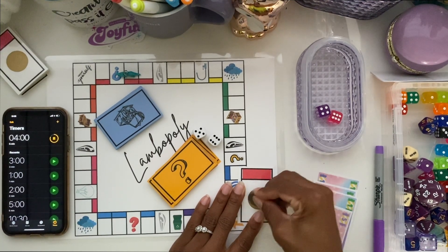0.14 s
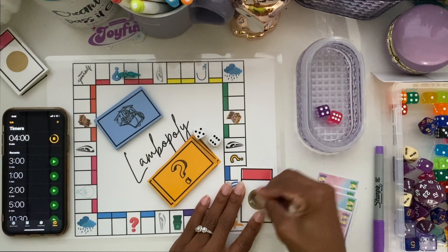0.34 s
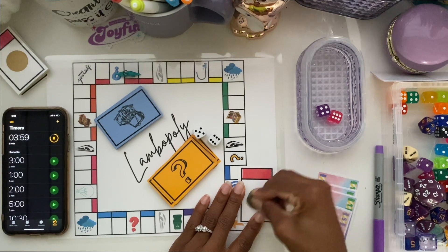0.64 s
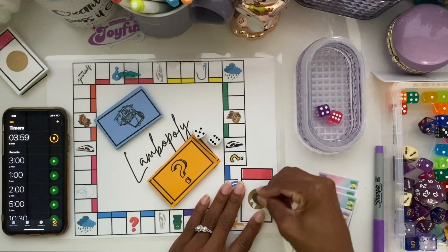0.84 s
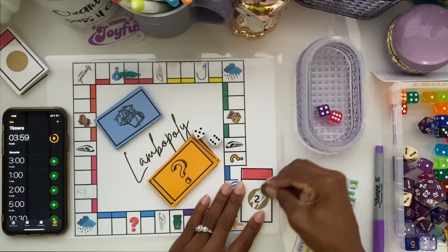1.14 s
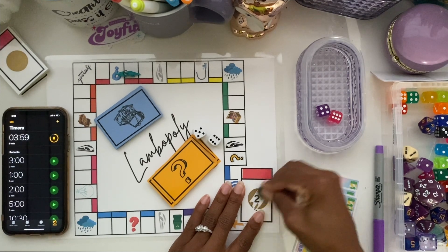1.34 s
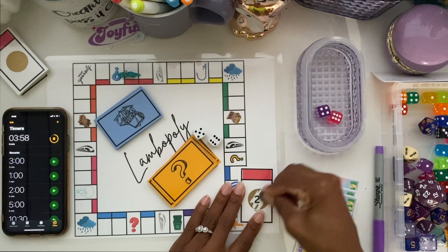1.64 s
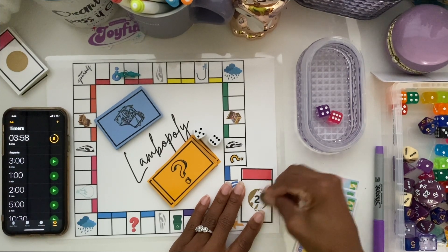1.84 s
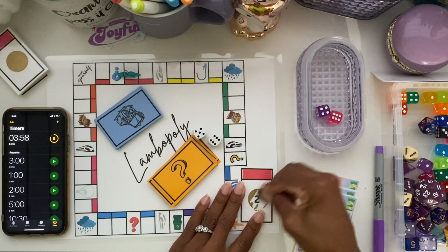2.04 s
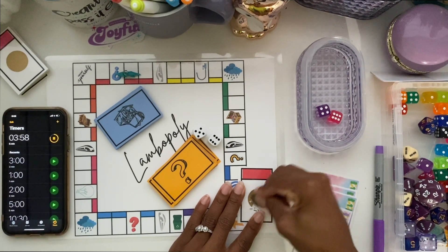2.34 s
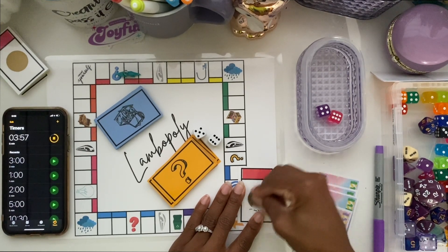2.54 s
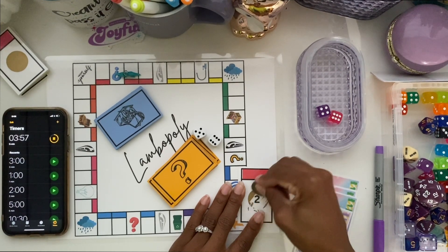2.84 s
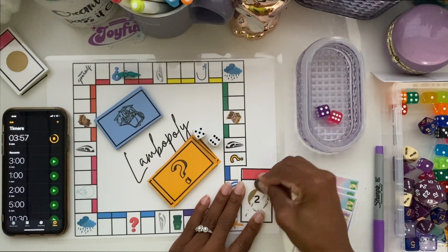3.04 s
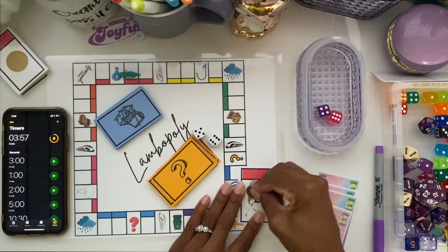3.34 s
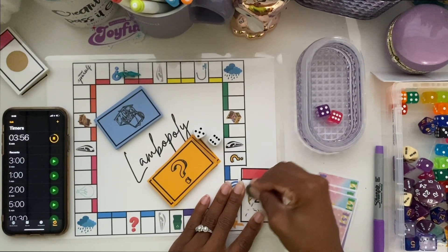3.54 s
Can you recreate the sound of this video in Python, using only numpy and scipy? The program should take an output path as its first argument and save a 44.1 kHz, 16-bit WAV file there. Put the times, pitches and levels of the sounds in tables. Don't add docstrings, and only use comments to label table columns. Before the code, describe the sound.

A coin scratches coating off a card on a table, about nine or ten short gritty strokes a second, from 0 to about 3.6 seconds. Strokes vary in loudness; the edge snags and knocks the board, notably near 0.65, 2.35 and 2.55 seconds, with a lesser knock near 3.5. The highest hiss dulls towards the end. Close stereo pickup, quiet room, faint low hum.

```python
import sys
import numpy as np
from scipy import signal
from scipy.fft import rfft, irfft, next_fast_len
from scipy.io import wavfile
from scipy.ndimage import uniform_filter1d

SR = 44100
rng = np.random.default_rng(int(sys.argv[2]) if len(sys.argv) > 2 else 0)


def amplitude_ratio(level_db):
    exponent = np.asarray(level_db, float) / 20
    return 10 ** exponent


def unload_audio(sound):
    columns = np.transpose(np.atleast_2d(sound))
    steps = np.round(np.clip(columns, -1, 1) * 32767)
    wavfile.write(sys.argv[1], SR, steps.astype(np.int16))


N = 163170

# pitch_hz, level_db (per Hz)
ROOM_AIR = [(30, -20), (55, 4.5), (130, -1.5), (500, -13), (1500, -32), (5000, -42), (11000, -40),
            (15000, -61)]
# pitch_hz, likeness_0_to_1
ROOM_LIKENESS = [(200, .98), (1500, .6), (6000, .99)]
ROOM_DB = -58
HUM_HZ, HUM_WIDTH_HZ, HUM_DB = 58.8, 0.92, -58.5

# start_s, length_s, hiss_db, card_db, table_db
EARLY_STROKES = [(0.045, 0.069, -71.5, -74.5, -67.5), (0.131, 0.082, -69.5, -68, -55.5),
                 (0.261, 0.075, -72.5, -74.5, -64), (0.361, 0.077, -66, -64.5, -53.5),
                 (0.471, 0.066, -73.5, -73.5, -62.5), (0.598, 0.069, -67.5, -67, -54.5),
                 (0.696, 0.097, -71.5, -72, -66.5), (0.811, 0.071, -70.5, -70.5, -61.5),
                 (0.946, 0.053, -66, -67.5, -65.5), (1.037, 0.075, -66.5, -65.5, -57.5),
                 (1.146, 0.076, -66, -68.5, -71), (1.257, 0.059, -68.5, -71, -62),
                 (1.361, 0.096, -71, -68, -67.5), (1.475, 0.08, -69, -67.5, -57.5),
                 (1.584, 0.076, -70, -73.5, -68), (1.689, 0.077, -70, -66.5, -58.5),
                 (1.793, 0.063, -67.5, -67.5, -69)]
LATE_STROKES = [(1.9, 0.057, -69, -66.5, -64), (1.985, 0.077, -73, -73.5, -67),
                (2.088, 0.078, -69.5, -69, -59.5), (2.183, 0.077, -70, -72, -70),
                (2.306, 0.057, -68.5, -65.5, -52), (2.385, 0.087, -73.5, -73.5, -66.5),
                (2.494, 0.081, -70, -69, -57), (2.593, 0.087, -73.5, -68.5, -63),
                (2.706, 0.083, -72, -69.5, -54.5), (2.809, 0.059, -74, -71, -71.5),
                (2.916, 0.069, -73, -72.5, -54.5), (3.019, 0.07, -68, -67, -60),
                (3.117, 0.071, -71.5, -73.5, -59), (3.222, 0.06, -68.5, -69.5, -69),
                (3.334, 0.043, -72.5, -72.5, -57.5), (3.418, 0.056, -72.5, -69.5, -72),
                (3.504, 0.062, -69.5, -71, -51), (3.603, 0.061, -74, -74.5, -83)]
# hiss_db, card_db, table_db
STROKE_LEAN = [
    [5, 0.7, .1],
    [4.3, 0.76, -0.058],
]
RISE, FALL = 0.5, 0.28
# hiss_db, card_db, table_db
OWN_JUDDER_DB = [.8, 2.5, 2.5]
SHARED_JUDDER_DB = 1.5
GRIT_PER_S, GRIT_DB = 14000, 1.5
LUMPS_PER_S, LUMP_DB = 700, 4
# time_s, level_db
COIN_TILT = [(.1, -2), (.3, -1), (.5, -2), (.73, -2), (.95, -5.5), (1.18, -3.5), (1.4, 0), (1.62, -1.5),
             (1.83, -4.5), (2.03, 1), (2.22, -1), (2.42, 0), (2.63, 1.5), (2.84, 3), (3.05, .5), (3.25, 2),
             (3.45, 1.5), (3.64, 1.5)]
# time_s, level_db
COATING_WEAR = [
    (2.3, -10.5),
    (3.45, -18),
    (3.7, -29),
]
# low_db, middle_db
HISS_DB = [-3.5, -2]
GRIT_EDGE_HZ = 15600

# time_s, board_db, table_db, card_db, tick_db
SNAGS = [(0.134, -39, -46.5, -65, -82), (0.199, -55, -49.5, -58.5, -80),
         (0.248, -55, -56.5, -69, -88), (0.361, -48, -66, -76, -85), (0.378, -41.5, -69, -66, -72),
         (0.417, -61, -44.5, -79, -63), (0.438, -42.5, -42.5, -60, -85),
         (0.594, -48.5, -59, -66, -86), (0.645, -27, -37.5, -41.5, -61),
         (0.652, -22.5, -43, -40, -68), (0.712, -36, -38, -53, -67), (0.774, -45, -72, -50.5, -65),
         (0.816, -43, -61.5, -62, -77), (0.924, -55, -70, -74, -94), (0.986, -44, -54, -60, -82),
         (1.036, -49, -73, -69, -80), (1.086, -42.5, -43, -67, -59.5), (1.106, -35, -44, -45.5, -58),
         (1.313, -33.5, -36.5, -44, -57.5), (1.362, -43, -69, -66, -86),
         (1.435, -33.5, -43.5, -45.5, -72), (1.479, -38, -43, -68, -83), (1.703, -59, -59, -64, -71),
         (1.738, -39, -68, -64, -78),
         (1.928, -47, -51, -57, -75), (1.942, -40.5, -46.5, -67, -82), (1.961, -48, -60, -57.5, -74),
              (1.99, -53, -62, -58, -73), (2.04, -43, -52, -49.5, -72), (2.049, -50, -52, -53.5, -77),
              (2.146, -31, -38, -41, -54), (2.185, -40.5, -43, -52, -69), (2.344, -18, -32.5, -27.5, -53),
              (2.39, -38.5, -41, -51.5, -75), (2.455, -36, -47.5, -41.5, -50.5),
              (2.556, -15.5, -38, -29, -50), (2.595, -38, -41, -51.5, -72), (2.637, -42, -62, -61, -67),
              (2.713, -62, -72, -70, -84), (2.766, -45.5, -37.5, -54, -64), (2.825, -65, -46, -51, -69),
              (2.835, -36.5, -50, -55.5, -61), (2.947, -44.5, -45, -60, -70),
              (2.964, -45, -38.5, -48.5, -79), (3.028, -56, -51, -52, -77), (3.037, -40.5, -55, -48.5, -73),
              (3.069, -45, -79, -54, -68), (3.282, -44, -49, -58.5, -77), (3.323, -47.5, -55, -69, -91),
              (3.47, -38.5, -50, -54.5, -72), (3.508, -28.5, -42.5, -61, -82), (3.554, -52, -55, -67, -82)]
# board_db, table_db, card_db, coin_db
SNAG_TRIM_DB = [-8, 8.5, 2, 7.5]
# board_s, table_s, card_s, coin_s
CONTACT_S = [.00008, .0004, .00003, .000004]
CHATTER = [.03, .01, .2, .5]
RATTLE = [0.04, 0.047, 0.098, 0.014]
# low_db, middle_db, top_db
TICK_DB = [-4.5, -6.5, -7.5]
# low_hz, high_hz
CLICK_BAND = [7600, 15300]
SNAG_S, RATTLE_S = 0.0008, 0.0064
CLICK_DB, BOARD_DB = -5, -1

# pitch_hz, level_db, t60_s
TABLE_MODES = [(82.8, -4, 0.46), (134, -4.5, 0.042), (181, -1, 0.14), (240, -3.5, 0.11),
               (320.9, -2.5, 0.33), (430.5, 3.5, 0.3)]
BOARD_MODES = [(562, 1, 0.016), (626, 0.5, 0.098), (698, 2, 0.031), (909, -1.5, 0.043), (1084, -1.5, 0.033),
               (1214, -2.5, 0.084)]
CARD_MODES = [(1530, 2, 0.019), (1738, -2.5, 0.014), (2274, -1, 0.042), (2730, -9.5, 0.019),
              (3040, 0, 0.0087), (3456, -8, 0.013), (3910, -22.5, 0.0099)]
COIN_MODES = [(4503, 5, 0.0034), (5660, -14, 0.0076), (6970, 2.5, 0.0041), (7740, -3, 0.0041),
              (9490, -2, 0.0024), (11820, -10.5, 0.0016), (12480, -32, 0.0024), (14900, -27, 0.0055)]
BEND_S = 0.0018
SPOT_DB, SPOT_DETUNE, SPOTS_PER_S = 2.5, 0.012, 3.1
CRACK_DB, CRACK_CYCLES, CRACK_HZ = 8, 2.6, 200

# pitch_hz, lag_radians
PORT_LAG = [(0, 0), (3000, -.7), (5200, -.4), (7000, -3), (7750, -3.4), (10500, -6.3), (12900, -9.1),
            (14000, -9.65), (17000, -12.6)]
# pitch_hz, level_db
PORT_BALANCE = [(60, -0.5), (350, -4.5), (1400, 3), (2800, 0)]
# pitch_hz, level_db
PORT_SPREAD = [(300, -26), (1000, -11), (5500, -12), (7000, -28)]
ECHO_T60, ECHO_DB, ECHO_DULL_HZ = 0.13, -8.5, 2420
SWEEP_SAMPLES = 0.12
EDGE_HZ = 16550


def evened(x):
    return x / np.sqrt(np.mean(x ** 2) + 1e-20)


def read(points, hz):
    f, value = np.transpose(points)
    return np.interp(np.log(hz + 1), np.log(f + 1), value)


def right_lag(hz):
    return np.exp(1j * np.interp(hz, *np.transpose(PORT_LAG)))


def room():
    hz = np.fft.rfftfreq(N, 1 / SR)
    a, b, c, d, e, f = rng.standard_normal((6, len(hz)))
    same = np.clip(read(ROOM_LIKENESS, hz), 0, 1)
    left = a + 1j * b
    right = right_lag(hz) * (same * left + np.sqrt(1 - same ** 2) * (c + 1j * d))
    colour = amplitude_ratio(read(ROOM_AIR, hz)) * (hz < GRIT_EDGE_HZ)
    air = irfft(colour * np.array([left, right]), N)
    waver = irfft((e + 1j * f) / (1 + (2 * (hz - HUM_HZ) / HUM_WIDTH_HZ) ** 2), N)
    hum = 0.5 * evened(waver) + np.sin(2 * np.pi * HUM_HZ * np.arange(N) / SR)
    return amplitude_ratio(ROOM_DB) * evened(air) + amplitude_ratio(HUM_DB) * evened(hum)


def pressure():
    t, out = np.arange(N) / SR, np.zeros((3, N))
    for k, (start, length, *levels_db) in enumerate(EARLY_STROKES + LATE_STROKES):
        u = (t - start) / length
        ramp = np.clip(np.minimum((u + 0.25) / RISE, (1.1 - u) / FALL), 0, 1)
        shape = np.sin(np.pi / 2 * ramp) ** 2.67
        lean = amplitude_ratio(np.c_[STROKE_LEAN[k % 2]] * np.clip(u - 0.5, -1, 1))
        out += amplitude_ratio(levels_db)[:, None] * shape * lean
    judder = uniform_filter1d(rng.standard_normal((4, N)), size=350)
    judder = evened(uniform_filter1d(judder, size=350))
    return out * amplitude_ratio(SHARED_JUDDER_DB * judder[3] + np.c_[OWN_JUDDER_DB] * judder[:3])


def grains(per_s, spread_db):
    chance, size, sign = rng.random(N), rng.exponential(1, N), rng.choice([-1., 1.], N)
    return evened((chance < per_s / SR) * sign * amplitude_ratio(spread_db * np.minimum(size, 4)))


def snags():
    rows, t = SNAGS, np.arange(1200) / SR
    force, rough = np.zeros((4, N)), rng.standard_normal((len(rows), 1200))
    knock = np.arange(1200) == round(SNAG_S * SR)
    for (time, *levels_db), r in zip(rows, rough):
        blow = np.c_[CHATTER] * r * t / SNAG_S * np.exp(1 - t / SNAG_S) + knock
        blow = blow + np.c_[RATTLE] * r * (abs(r) > 2.3) * np.exp(-t / RATTLE_S)
        blow = blow / np.linalg.norm(blow, axis=1)[:, None]
        at = round(time * SR)
        force[:, at:at + 1200] += amplitude_ratio(np.add(levels_db, SNAG_TRIM_DB))[:, None] * 9 * blow
    soft = np.exp(-((t - t[-1] / 2) / np.c_[CONTACT_S]) ** 2 / 2)
    return signal.oaconvolve(force, soft / soft.sum(1)[:, None], "same", axes=1)


def ring(modes):
    t, out = np.arange(6000) / SR, 0
    spot = rng.standard_normal((len(modes), 2))
    for k, ((hz, db, t60), (louder, sharper)) in enumerate(zip(modes, spot)):
        decay = amplitude_ratio(db + SPOT_DB * louder - 60 * t / t60) / np.sqrt(t60)
        swell = 1 - np.exp(-(t / (BEND_S * np.sqrt(500 / hz))) ** 2)
        crack = 1 + (hz > CRACK_HZ) * amplitude_ratio(CRACK_DB) * np.exp(-t * hz / CRACK_CYCLES)
        tone = np.sin(2 * np.pi * hz * (1 + SPOT_DETUNE * sharper) * t + np.pi * k)
        out = out + decay * swell * crack * tone
    return out / np.linalg.norm(out)


def coin():
    t = np.arange(N) / SR
    hiss, card, table = pressure()
    grit, lumps = grains(GRIT_PER_S, GRIT_DB), grains(LUMPS_PER_S, LUMP_DB)
    grit = signal.oaconvolve(grit, signal.firwin(255, GRIT_EDGE_HZ, fs=SR), "same")
    board_rub = amplitude_ratio(BOARD_DB) * card ** 0.31 * table ** 0.74 * lumps
    table_rub = table * lumps
    card_rub = card * (1.13 * grit + 0.19 * lumps)
    coin_rub = hiss * amplitude_ratio(1.5) * grit

    blows = snags()
    click = signal.oaconvolve(blows[3], signal.firwin(63, CLICK_BAND, pass_zero=False, fs=SR), "same")
    tilt_db = np.interp(t, *np.transpose(COIN_TILT))
    worn_db = np.interp(t, *np.transpose(COATING_WEAR))
    hiss_db = [HISS_DB[0], HISS_DB[1] + tilt_db, tilt_db + worn_db]
    forces = [board_rub + blows[0], table_rub + blows[1], card_rub + blows[2]]
    forces += [blows[3] * amplitude_ratio(tick) + coin_rub * amplitude_ratio(db) for tick, db in zip(TICK_DB, hiss_db)]
    bodies = [BOARD_MODES, TABLE_MODES, CARD_MODES, COIN_MODES[:3], COIN_MODES[3:6], COIN_MODES[6:]]

    spots = [np.sqrt(2 / 3) * abs(np.cos(np.pi * (SPOTS_PER_S * t + k / 3))) for k in range(3)]
    out = amplitude_ratio(CLICK_DB) * click
    for force, modes in zip(forces, bodies):
        for weight in spots:
            out = out + signal.oaconvolve(force * weight, ring(modes))[:N]
    return out


def ports(x):
    size, t = next_fast_len(N + SR // 2), np.arange(SR // 4) / SR
    hz = np.fft.rfftfreq(size, 1 / SR)
    near = rng.standard_normal(SR // 4) * amplitude_ratio(-60 * t / 0.02)
    unlike = amplitude_ratio(read(PORT_SPREAD, hz)) * rfft(near / np.linalg.norm(near), size)
    far = rng.standard_normal((2, SR // 4)) * amplitude_ratio(-60 * t / ECHO_T60) * (t > 0.004)
    echo = amplitude_ratio(ECHO_DB) * rfft(far / np.linalg.norm(far[0]), size)
    echo = echo / np.sqrt(1 + (hz / ECHO_DULL_HZ) ** 2)
    apart = np.clip(np.minimum(hz / 1500, 2 - hz / 3500), 0.08, 1)
    echo = apart * echo + (1 - apart) * echo[0]
    balance = amplitude_ratio(read(PORT_BALANCE, hz) / 2)
    heard = rfft(x, size) * (1 + np.array([unlike, -unlike]) + echo)
    return irfft(heard * [balance, right_lag(hz) / balance], size)[:, :N]


def swept(x):
    starts = [row[0] for row in EARLY_STROKES + LATE_STROKES]
    place = np.interp(np.arange(N) / SR, starts, (-1.) ** np.arange(len(starts)))
    slope = irfft(rfft(x) * 2j * np.pi * np.fft.rfftfreq(N), N)
    return x + SWEEP_SAMPLES * place * slope * [[1], [-1]]


def scene():
    return swept(ports(coin())) + room()


def top_cut(x):
    return signal.sosfilt(signal.butter(12, 16630, fs=SR, output="sos"), x)


def record(dry):
    low_pass = signal.firwin(255, EDGE_HZ, window=("kaiser", 5), fs=SR)
    mix = signal.oaconvolve(dry, low_pass[None], "same")
    return top_cut(mix)


dry = scene()
out = record(dry)
unload_audio(out)
```